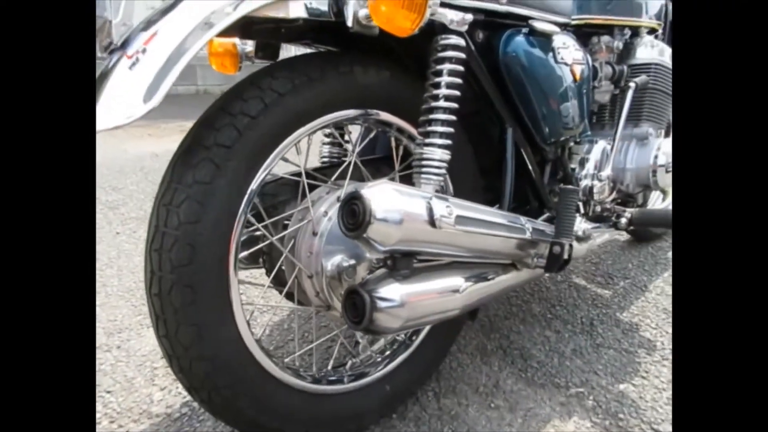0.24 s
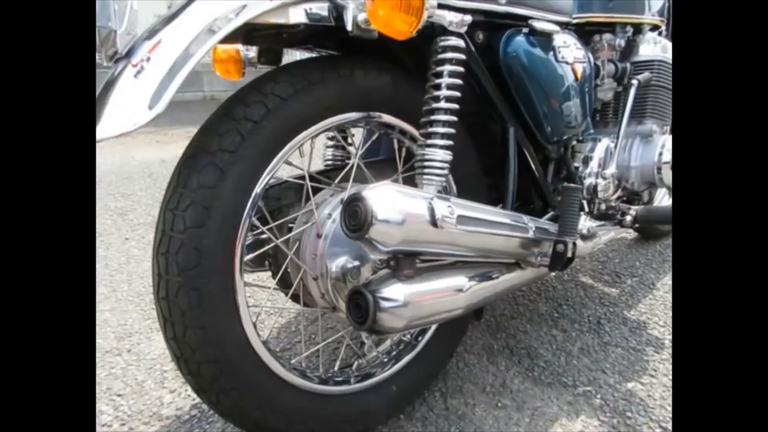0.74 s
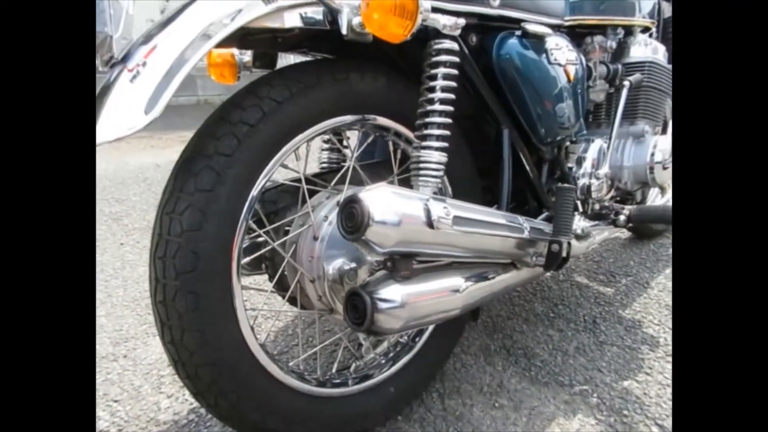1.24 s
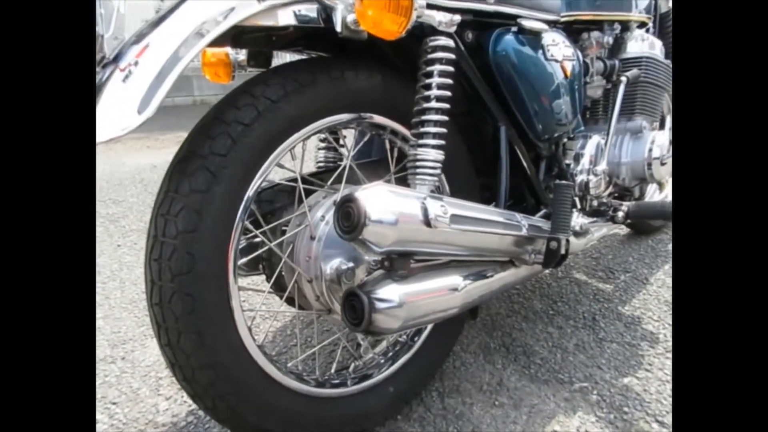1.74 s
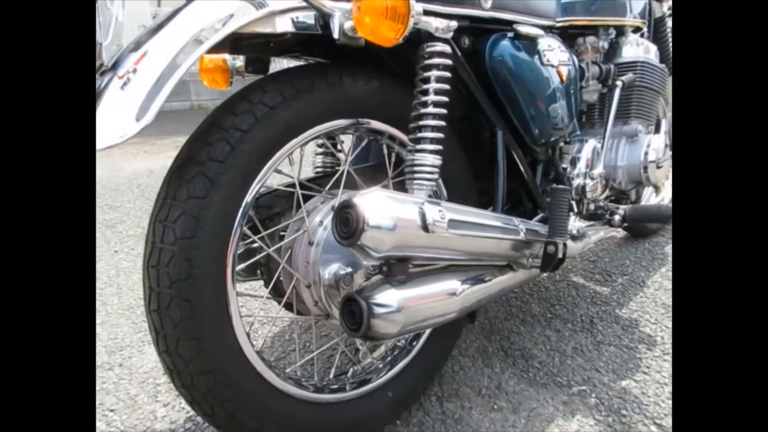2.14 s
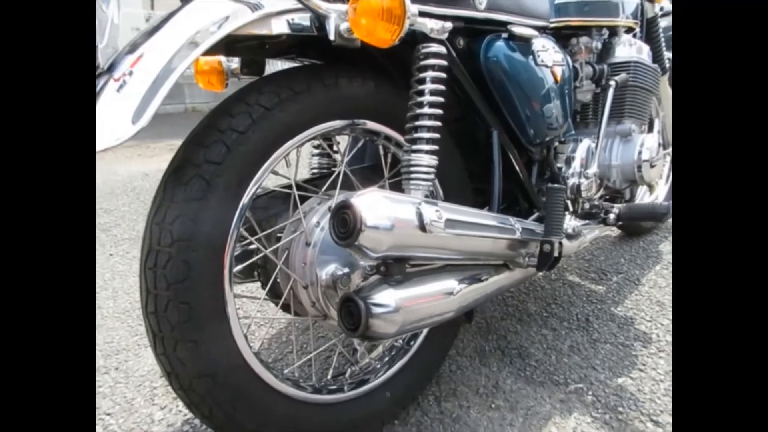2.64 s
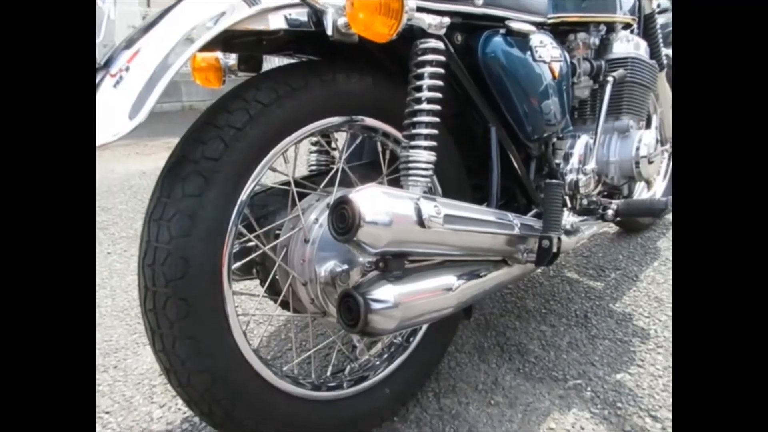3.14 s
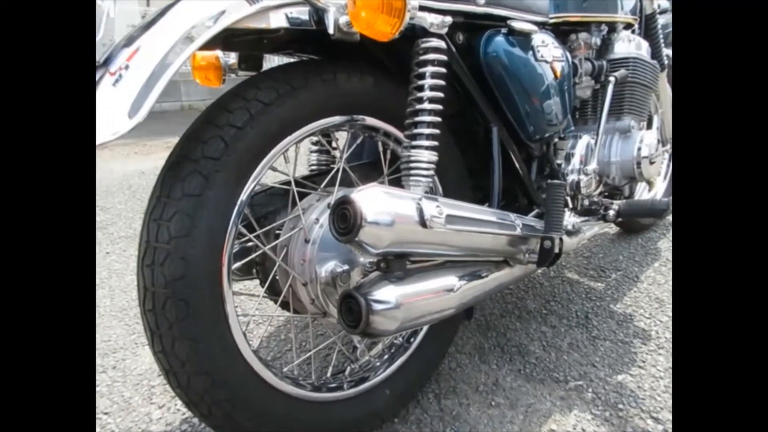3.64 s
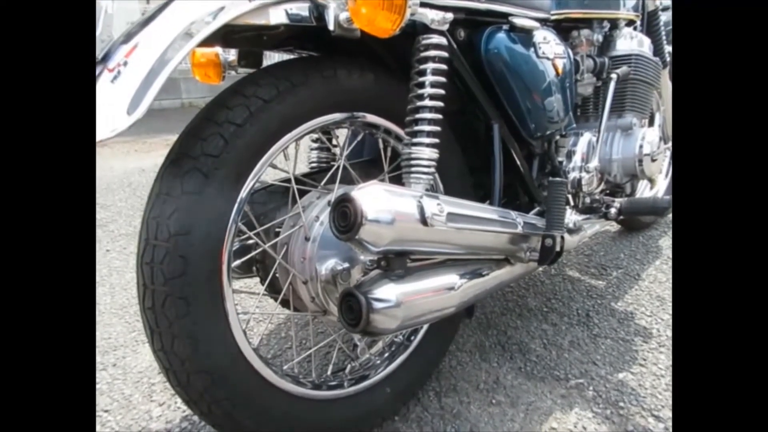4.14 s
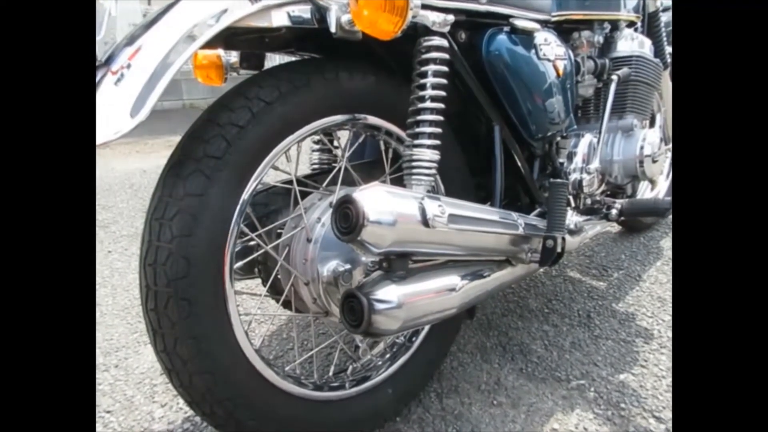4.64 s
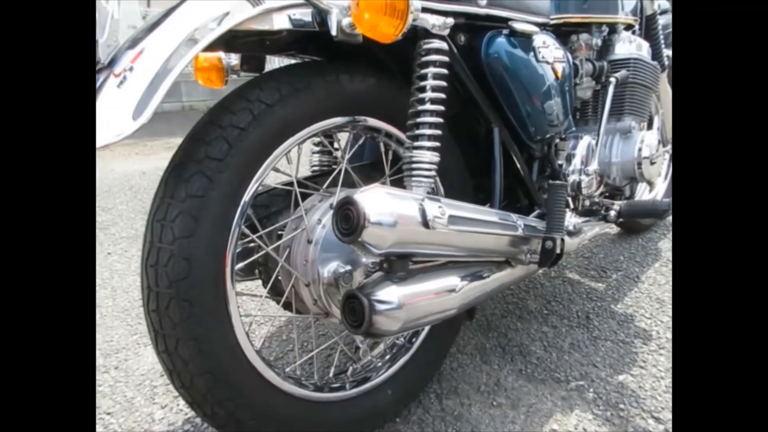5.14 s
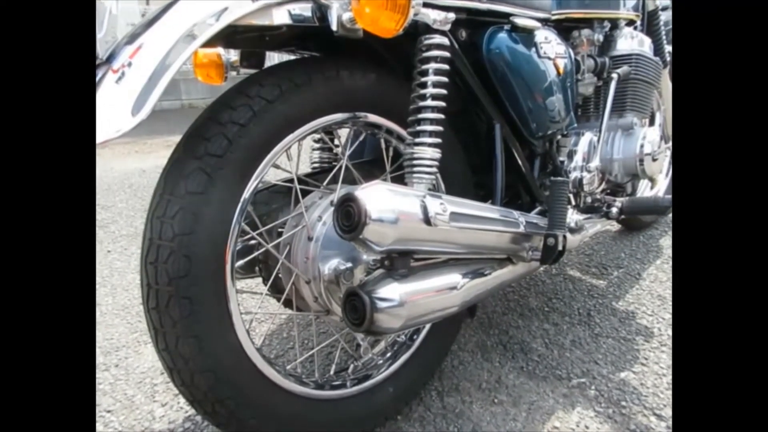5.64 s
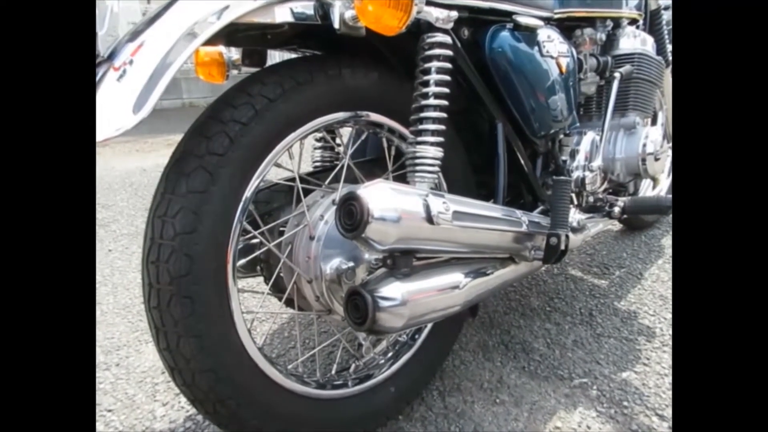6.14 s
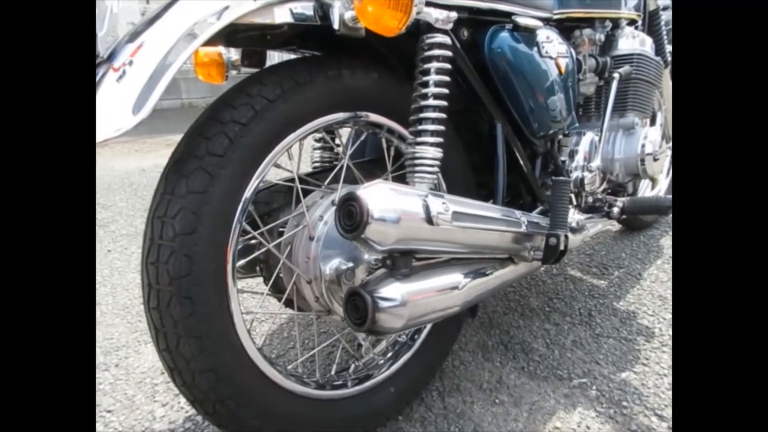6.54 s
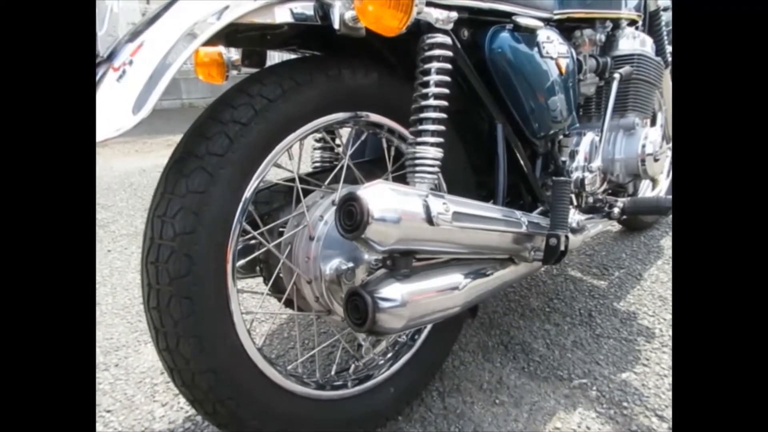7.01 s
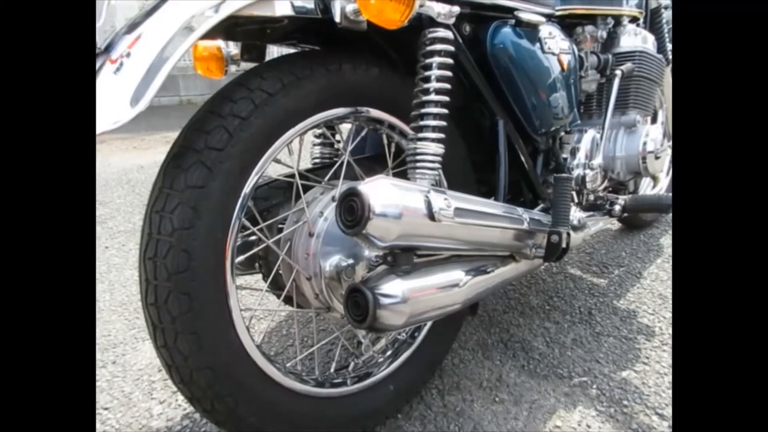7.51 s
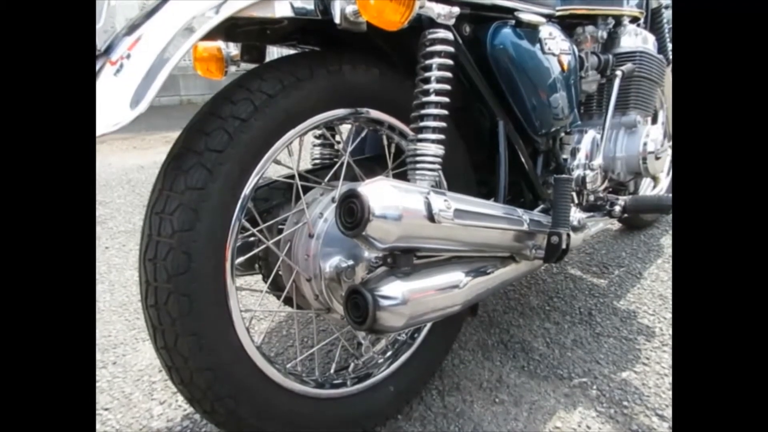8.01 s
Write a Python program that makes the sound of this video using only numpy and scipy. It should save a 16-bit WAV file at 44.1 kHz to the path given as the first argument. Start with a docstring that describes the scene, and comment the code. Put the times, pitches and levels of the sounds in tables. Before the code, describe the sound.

A four-cylinder motorcycle blips its throttle five times, each rev rising in a hollow boom and sinking to a lumpy, chirping idle.

```python
"""Four-cylinder motorcycle, throttle blips

Four pipes stand close to a stereo listener; five blips rise from a lumpy idle. Each firing booms in the
silencer; the nearest pipe chirps once a cycle by a jet whistling in its outlet. Gas roars in the pipes and
hisses at the outlets, the valve gear ticks, opening slides suck air. Unburnt gas pops twice near a shutting
throttle. The level starts low and climbs; after the second blip it drops suddenly and climbs back."""
import sys
import numpy as np
from scipy import signal
from scipy.io import wavfile
from scipy.ndimage import uniform_filter1d

SR = 44100
rng = np.random.default_rng(int(sys.argv[2]) if len(sys.argv) > 2 else 0)


def boost(x):
    """Linear amplitude factor 10**(x/20) for a level x in decibels (scalar or array-like)."""
    u = np.asarray(x, float) / 20
    return 10 ** u


def generate_wav(signal):
    """Clip the signal to [-1, 1] and save it as 16-bit WAV at the path in sys.argv[1]."""
    frames = np.transpose(np.atleast_2d(signal))
    scaled = np.clip(frames, -1, 1) * 32767
    pcm = np.round(scaled).astype(np.int16)
    wavfile.write(sys.argv[1], SR, pcm)


N = 364707
T = np.arange(N) / SR

# throttle blips, the first shut before t = 0: grip turns t/s, speed climbs t/s, grip shuts t/s,
# nominal crest speed/rpm, boom and roar offset/dB, hiss offset/dB
BLIPS = [(-1, -.92, -.55, 4400, 0, 0), (.68, .72, 1.05, 4050, 2.5, -1.5),
         (2.13, 2.215, 2.645, 4250, .5, -.7), (3.74, 3.77, 4.15, 4900, -1.2, -.7),
         (5.2, 5.30, 5.69, 4800, -1, 1), (6.72, 6.80, 7.185, 4750, 0, .5)]
# nearest-pipe firings: t/s, chirp level/dB, chirp f/Hz, upper-ring gain re chirp/dB
NEAR_FIRINGS = [(0.0214, -34, 2550, -20), (0.0942, -23, 2500, -18), (0.1785, -22, 2560, -15),
                (0.2823, -18, 2370, -19), (0.4095, -17, 2530, -17), (0.5531, -14, 2400, -18),
                (0.7118, -17, 2490, -15), (0.8131, -7, 2430, -17), (0.9941, -15, 2680, -21),
                (1.0824, -11, 2360, -16), (1.1478, -17, 2500, -22), (1.2141, -19, 2430, -26),
                (1.2501, -22, 2480, -16), (1.2895, -23, 2470, -14), (1.3329, -17, 2490, -21),
                (1.3774, -28, 2580, -15), (1.4316, -22, 2430, -23), (1.492, -25, 2650, -22),
                (1.5514, -24, 2470, -17), (1.6317, -32, 2560, -21), (1.715, -19, 2550, -17),
                (1.8238, -17, 2530, -17), (1.9455, -16, 2220, -25), (2.0877, -8, 2400, -22),
                (2.2338, -9, 2380, -15), (2.3296, -7, 2540, -13), (2.3905, -17, 2500, -18),
                (2.4359, -16, 2410, -16), (2.4788, -12, 2430, -21), (2.5162, -17, 2440, -14),
                (2.5531, -14, 2440, -17), (2.6484, -13, 2570, -10), (2.6784, -31, 2550, -13),
                (2.8589, -24, 2540, -22), (2.9826, -23, 2540, -25), (3.1393, -38, 2540, -18),
                (3.2081, -26, 2570, -19), (3.2884, -26, 2430, -17), (3.3832, -25, 2560, -16),
                (3.4984, -20, 2540, -20), (3.6331, -24, 2540, -18), (3.7673, -16, 2370, -19),
                (3.8636, -8, 2570, -16), (3.9235, -14, 2450, -7), (3.9674, -12, 2460, -12),
                (4.0687, -11, 2560, -11), (4.1694, -11, 2480, -15), (4.3655, -16, 2540, -22),
                (4.3989, -16, 2440, -22), (4.5126, -21, 2370, -20), (4.6513, -18, 2540, -19),
                (4.7117, -18, 2490, -25), (4.784, -35, 2580, -15), (4.8599, -14, 2390, -20),
                (4.9506, -16, 2500, -15), (5.0584, -12, 2590, -20), (5.1861, -16, 2430, -14),
                (5.3193, -11, 2440, -20), (5.4111, -14, 2380, -3), (5.467, -9, 2440, -13),
                (5.5064, -15, 2230, -8), (5.5418, -13, 2510, -10), (5.5757, -12, 2520, -13),
                (5.6042, -10, 2340, -10), (5.6311, -15, 2690, -5), (5.6565, -13, 2700, -9),
                (5.6844, -18, 2510, -17), (5.8117, -23, 2380, -20), (5.8706, -21, 2420, -20),
                (5.9015, -26, 2510, -14), (5.9359, -19, 2430, -19), (6.0102, -16, 2520, -30),
                (6.0521, -17, 2620, -27), (6.0985, -13, 2540, -21), (6.1399, -20, 2610, -20),
                (6.2028, -28, 2550, -18), (6.2577, -17, 2520, -26), (6.3295, -24, 2640, -20),
                (6.4123, -21, 2640, -18), (6.5131, -15, 2510, -20), (6.6318, -18, 2640, -17),
                (6.7645, -15, 2640, -18), (6.8793, -7, 2490, -20), (6.9446, -9, 2420, -11),
                (7.0319, -12, 2560, -8), (7.0943, -10, 2400, -14), (7.2804, -20, 2560, -21),
                (7.3083, -21, 2460, -20), (7.3687, -15, 2490, -20), (7.4026, -17, 2520, -18),
                (7.437, -18, 2370, -20), (7.4749, -12, 2370, -26), (7.5158, -16, 2530, -25),
                (7.5592, -15, 2590, -21), (7.6026, -21, 2580, -22), (7.654, -19, 2440, -23),
                (7.7214, -19, 2650, -28), (7.7812, -22, 2450, -19), (7.8585, -21, 2630, -22),
                (7.9488, -18, 2630, -14), (8.0596, -19, 2380, -22), (8.1828, -19, 2560, -12)]
# level by crank speed, throttle shut: speed/rpm, boom level/dB, roar level/dB, hiss level/dB, chirp level/dB
SHUT_LEVELS = [(800, -25.5, -43.5, -51.5, -22), (2000, -23.5, -40.5, -50, -24),
               (2550, -20.5, -37.5, -46.5, -22), (2950, -14.5, -35, -44.5, -24), (3700, -15, -33, -43, -28),
               (4800, -20.5, -31, -41, -37)]
# the same, throttle open: speed/rpm, boom level/dB, roar level/dB, hiss level/dB, chirp level/dB
OPEN_LEVELS = [(800, -17.5, -34, -40, -12), (1700, -16, -28.5, -35, -13), (2900, -16, -21, -36.5, -13),
               (3800, -18, -19, -36, -13), (4900, -22.5, -19.5, -34.5, -13)]
# sudden level drops: t/s, depth/dB, recovered t/s
LEVEL_DROPS = [(-.3, -4, .8), (2.66, -8.5, 3.95)]
# stereo width of the gas noise: f/Hz, side re mid/dB
NOISE_WIDTH = [(60, -34), (150, -32), (380, -26), (950, -22), (2380, -21), (5980, -4), (15000, -1)]
# treble loss of slow gas: f/Hz, gain/dB
SLOW_GAS_DULLING = [(2500, 0), (3500, -5), (5500, -8), (7000, -3), (9000, 0)]
# whistles at the throttle slides: f/Hz, level/dB, t60/s
SLIDE_WHISTLES = [(5400, -8, .015), (5950, -8, .015), (8600, -17, .01)]
# afterfire: t/s, relative level/dB, t60/s
AFTERFIRES = [(1.077, -26, .05), (2.638, -13.5, .05)]
# outlet jet noise spectrum: f/Hz, relative level per Hz/dB
HISS_SPECTRUM = [(760, -58), (1300, -12.5), (2010, -10), (2550, -4), (2860, -10), (3200, -10.5),
                 (4030, -19), (4850, -5), (5670, -17), (7000, -23), (9920, -26), (10800, -30),
                 (13000, -24.5), (15500, -38)]
# pipe turbulence spectrum: f/Hz, relative level per Hz/dB
ROAR_SPECTRUM = [(110, -27), (180, -12), (264, -12), (329, -13), (400, -8), (562, -8), (800, -11),
                 (1100, -14), (2000, -26), (2600, -64.5), (4400, -120)]
# pipe modes: f/Hz, level/dB, t60/s
PIPE_MODES = [(240, -5, .05), (330, -1, .065), (410, -5, .045), (490, -1.5, .06), (565, -4, .055),
              (740, -7, .045), (890, -8, .04), (1150, -14, .04)]
# nearest-pipe modes at idle: f/Hz, level/dB, t60/s
NEAR_MODES = [(345, 0, .05), (245, -4, .12), (440, -6, .03)]
# silencer modes: f/Hz, level/dB, t60/s
SILENCER_MODES = [(109.2, 3.5, .13), (67, -12.5, 0.086), (165.4, -7.5, 0.028)]
# hum partials: multiple of the cycle rate, level throttle shut/dB, level throttle open/dB
HUM_PARTIALS = [(2, -18, -3), (3, -19, -6), (4, 0, -2), (5, -14, -7), (6, -13, -7), (7, -19, -9),
                (8, -17, -8), (10, -24, -9), (12, -23, -4), (14, -32, -10)]
# what the silencers pass of the hum: f/Hz, gain/dB
SILENCER_PASS = [(40, -22), (70, -10), (95, -1), (120, 0), (170, -2), (260, -6), (600, -8)]
# side partials of the chirp: f/Hz, level/dB
CHIRP_SIDES = [(2190, -8), (2650, -8)]
# upper ring of the chirp: f/Hz, level/dB
CHIRP_OVERTONES = [(4900, 0), (5340, -4), (6100, -10), (7800, -17), (8600, -18), (10010, -15)]

# speed before the listed firings re-time the crank; past its crest it falls by a factor e in COAST_S
IDLE_RPM, COAST_S, CREST_LAG_S, CLIMB_POWER = 850, .53, .07, 1.5
GRIP_OPEN_S, GRIP_SHUT_S = .17, .07
LINGER_S = .45  # fade of a blip's level offsets after the grip shuts
DROP_POWER = 2.5  # above 1: recovers slowly at first
OVERRUN_DULLING = .6  # least share of the dulling with the throttle shut
INTAKE_DB, INTAKE_OPEN_S, INTAKE_LEAD_S = -47, .14, .06
INTAKE_LOW_HZ, INTAKE_HIGH_HZ = 3600, 9500
CHIRP_SWING_DB, CHIRP_SCATTER_DB = 2.5, 2.5  # unlisted chirps: alternate strong and weak
USUAL_CHIRP_HZ, USUAL_RING_DB = 2480, -16
SNAP_DB, SNAP_S = -13, .0022  # bright noise re upper ring; Gaussian sigma


def rms_one(x):
    """Scales to rms 1."""
    return x / np.sqrt(np.mean(x ** 2) + 1e-20)


def at_hz(points, hz):
    """Reads a spectrum on a log-frequency axis."""
    table = np.array(points)
    return np.interp(np.log(hz), np.log(table[:, 0]), table[:, 1])


def band(x, low_hz, high_hz, order=1):
    """Butterworth band-pass."""
    return signal.sosfilt(signal.butter(order, [low_hz, high_hz], "band", fs=SR, output="sos"), x)


def evened(x, window_s):
    """Divides out the slow level, keeps the single beats."""
    size = int(window_s * SR)
    power = uniform_filter1d(uniform_filter1d(x ** 2, size), size)
    return x / np.sqrt(power + 1e-12)


def flutter(per_s):
    """Random wandering through unit-spread knots, per_s of them a second."""
    knots_s = np.arange(0, N / SR + 1, 1 / per_s)
    return np.interp(T, knots_s, rng.standard_normal(len(knots_s)))


def fading(clicks, t60_s):
    """Every click decays exponentially."""
    return signal.lfilter([1], [1, -boost(-60 / (t60_s * SR))], clicks + 1e-18)


def ring(clicks, modes):
    """Clicks set decaying sines ringing."""
    out = 0
    for hz, level_db, t60_s in modes:
        r = boost(-60 / (t60_s * SR))
        w = 2 * np.pi * hz / SR
        feed = [0, boost(level_db) * np.sin(w)]
        out = out + signal.lfilter(feed, [1, -2 * r * np.cos(w), r * r], clicks + 1e-18)
    return out


def banded_noise(spectrum, dulling=0):
    """Third-octave bands of stereo noise, each with its level, flutter and width; rms 1."""
    low_end_hz, high_end_hz = spectrum[0][0], spectrum[-1][0]
    edges_hz = low_end_hz * 2 ** np.arange(0, np.log2(high_end_hz / low_end_hz), 1 / 3)
    white = rng.standard_normal((2, 2, N))
    out = 0
    for k, (low_hz, high_hz) in enumerate(zip(edges_hz, edges_hz[1:])):
        mid, side = band(white[k % 2], low_hz, high_hz, order=2)
        hz = np.sqrt(low_hz * high_hz)
        level_db = at_hz(spectrum, hz) + dulling * at_hz(SLOW_GAS_DULLING, hz) + 2.8 * flutter(per_s=25)
        out = out + boost(level_db) * (mid + boost(at_hz(NOISE_WIDTH, hz)) * side * [[1], [-1]])
    return rms_one(out)


def opening(start_s, rise_s, shut_s, fall_s):
    """Linear ramp 0 to 1 from start_s, back to 0 from shut_s."""
    return np.clip(np.minimum((T - start_s) / rise_s, 1 - (T - shut_s) / fall_s), 0, 1)


def twist_grip():
    """Throttle 0-1, its boom, roar, hiss and chirp offsets/dB, and rpm: S-shaped climb, then coasting."""
    throttle, offset_db, rpm = np.zeros(N), np.zeros((4, N)), np.full(N, 1. * IDLE_RPM)
    for turns_s, climbs_s, shuts_s, top_rpm, low_db, hiss_db in BLIPS:
        throttle = throttle + opening(turns_s, GRIP_OPEN_S, shuts_s, GRIP_SHUT_S)
        blip_db = np.array([[low_db], [low_db], [hiss_db], [0]])
        offset_db = offset_db + opening(turns_s, GRIP_OPEN_S, shuts_s, LINGER_S) * blip_db
        crest_s = shuts_s + CREST_LAG_S
        progress = np.clip((T - climbs_s) / (crest_s - climbs_s), 0, 1)
        climb = IDLE_RPM + (top_rpm - IDLE_RPM) * np.sin(np.pi / 2 * progress) ** CLIMB_POWER
        coast = top_rpm * np.exp(-np.maximum(T - crest_s, 0) / COAST_S)
        rpm = np.maximum(rpm, np.where(T < crest_s, climb, coast))
    return throttle, offset_db, rpm


def cycles_turned(rpm):
    """Engine cycles so far; uneven crank motion ends a whole cycle on each listed firing."""
    even = np.cumsum(rpm / 120 / SR)
    firing_s = np.array(NEAR_FIRINGS)[:, 0]
    passed = even[(firing_s * SR).astype(int)]
    steps = np.round(np.diff(passed, prepend=passed[0] - 1))
    whole = np.cumsum(np.maximum(steps, 1))
    return even + np.interp(T, firing_s, whole - passed)


def levels(rpm, throttle):
    """Boom, roar, hiss and chirp level/dB, blended between shut and open throttle."""
    shut_rpm, *shut = np.transpose(SHUT_LEVELS)
    open_rpm, *wide = np.transpose(OPEN_LEVELS)
    return np.array([(1 - throttle) * np.interp(rpm, shut_rpm, a) + throttle * np.interp(rpm, open_rpm, b)
                     for a, b in zip(shut, wide)])


def level_drop():
    """Level/dB falls within 30 ms and climbs back, slowly at first."""
    out_db = 0
    for start_s, depth_db, back_s in LEVEL_DROPS:
        recovered = np.clip((T - start_s) / (back_s - start_s), 0, 1) ** DROP_POWER
        out_db = out_db + depth_db * np.clip((T - start_s) / .03, 0, 1) * (1 - recovered)
    return out_db


def firing_samples(cycles):
    """Four firings a cycle; cylinder 0 feeds the nearest pipe."""
    count = np.floor(4 * cycles).astype(int)
    at = np.flatnonzero(np.diff(count)) + 1
    return at, count[at] % 4


def chirp_levels(near, usual_db):
    """Chirps scatter round their usual level; listed firings have their own."""
    k = np.arange(len(near))
    level_db = usual_db[near] + CHIRP_SWING_DB * (-1) ** k + CHIRP_SCATTER_DB * rng.standard_normal(len(near))
    for s, db, _, _ in NEAR_FIRINGS:
        level_db[np.argmin(np.abs(near - s * SR))] = db
    return np.interp(np.arange(N), near, level_db)


def blowdown(at, cylinder, idling, throttle, chirp_db):
    """One pulse a firing: even on the overrun, ragged under load, lumpy and one-sided at idle."""
    far_db = np.array([0, -2.5, -1.5, -3.5])[cylinder] + idling[at] * np.array([0, -6, -11, -13])[cylinder]
    # a strong firing also chirps loudly
    near_db = (cylinder == 0) * idling[at] * .2 * (chirp_db[at] + 15)
    scatter_db = 1.0 + (3.5 * idling[at] + 2.2 * throttle[at]) * np.where(cylinder == 0, .3, 1)
    size, early = rng.standard_normal((2, len(at)))
    path_s = np.array([0.0015, 0.0024, 0.00037, 0.0002])[cylinder]  # delay by outlet
    jitter_s = (.00015 + .00012 * throttle[at]) * early
    arrival = np.clip(at + ((path_s + jitter_s) * SR).astype(int), 0, N - 1)
    pulses = np.zeros(N)
    pulses[arrival] = boost(far_db + near_db + scatter_db * size)
    return pulses


def valve_gear(rpm, hiss_db, dulling):
    """Tappets and chain: random ticks, denser with speed, each ringing a few ms on the head."""
    happens = rng.random(N) < .15 * rpm / SR
    sizes = boost(7.6 * np.minimum(rng.exponential(1, N), 4)) * happens
    pitches_hz, dealt = np.geomspace(900, 8000, 14), rng.integers(0, 14, N)
    pans = boost(rng.normal(0, 0.67, 14))
    stereo = 0
    for k, (hz, pan) in enumerate(zip(pitches_hz, pans)):
        clicks = sizes * (dealt == k) * boost(dulling * at_hz(SLOW_GAS_DULLING, hz))
        tick = ring(clicks, [(hz, at_hz(HISS_SPECTRUM, hz), .018)])
        stereo = stereo + tick * [[pan], [1 / pan]]
    return boost(hiss_db - 2.5 - 1.5 * dulling) * evened(stereo, 0.18)


def intake():
    """Air sucked past the opening slides: bright hiss with fluttering whistles."""
    flow = sum(opening(turns_s - INTAKE_LEAD_S, INTAKE_OPEN_S, shuts_s, GRIP_SHUT_S)
               for turns_s, _, shuts_s, *_ in BLIPS)
    white = rng.standard_normal((2, N))
    rush = rms_one(band(white + white[1], INTAKE_LOW_HZ, INTAKE_HIGH_HZ)) * boost(2.5 * flutter(per_s=40))
    whistles = 0
    for hz, db, t60_s in SLIDE_WHISTLES:
        tone = rms_one(ring(white + white[0], [(hz, 0, t60_s)]))
        whistles = whistles + tone * boost(db + 6 * flutter(per_s=30))
    return boost(INTAKE_DB + level_drop()) * flow * (rush + whistles)


def pops():
    """Unburnt gas lights in the pipe: a spit of bright noise that also blows the outlet whistle."""
    burst = 0
    for s, level_db, t60_s in AFTERFIRES:
        held = (T > s) & (T < s + .018)
        shape = rms_one(fading(held * 1., t60_s)) * np.sqrt(0.0083 * SR / N)
        burst = burst + boost(level_db + 1) * shape
    white = rng.standard_normal((2, N))
    spit = rms_one(band(white + 0.5 * white[0], 700, 6500))
    whistle = rms_one(ring(white[0], [(USUAL_CHIRP_HZ, 0, .012)]))
    return burst * (spit + 0.4 * whistle)


def hiss(pulses, throttle, hiss_db, dulling):
    """Jet noise at the outlets, swelling with each firing, in sharp spits under load."""
    gust = 2.2 + evened(uniform_filter1d(fading(pulses, .08), 260), .2)
    spits = evened(uniform_filter1d(fading(pulses ** 2, .03), 90), .1)
    swell = evened(gust + 1.1 * throttle * spits, 0.3)
    return boost(hiss_db + 7) * banded_noise(HISS_SPECTRUM, dulling) * swell


def roar(pulses, throttle, roar_db):
    """Sharp fronts ring each pipe mode with a strength of its own; turbulent gas follows them."""
    fronts = 0
    for mode in PIPE_MODES:
        strength = rng.normal(1, .4, N) + .17 * rng.standard_normal(N) * [[1], [-1]]
        fronts = fronts + ring(pulses * strength, [mode])
    fronts = evened(fronts, .2)
    # gas needs 3 ms to get going
    gust = 1.2 - throttle + evened(uniform_filter1d(fading(pulses, .05), 130), .2)
    share = .08 + 1.5 * throttle  # fronts steepen under load
    turbulence = banded_noise(ROAR_SPECTRUM) * rms_one(gust)
    return boost(roar_db) * evened(share * fronts + turbulence, 0.064)


def near_pipe(at, cylinder, idling, chirp_db):
    """At idle the nearest pipe rings after each of its own firings."""
    near, pulses = at[cylinder == 0], np.zeros(N)
    pulses[near] = boost(chirp_db[near] - 14.5) * idling[near]
    return ring(pulses, NEAR_MODES)


def chirps(at, cylinder, chirp_db, rpm):
    """A jet whistles and snaps in the outlet for a few ms; at speed the silencer's next swing blows it again."""
    out, t = np.zeros(N + SR), np.arange(round(.03 * SR)) / SR
    draws = rng.standard_normal((len(at), 6))
    level_db = chirp_db[at] + np.array([0, -53, -26, -22])[cylinder]
    again_db = np.interp(rpm, [1200, 2500], [-17, -9])
    main_hz = USUAL_CHIRP_HZ * (1 + .03 * draws[:, 1])
    ring_db = USUAL_RING_DB + 3.5 * draws[:, 4]
    near = np.flatnonzero(cylinder == 0)
    for s, _, hz, upper_db in NEAR_FIRINGS:
        k = near[np.argmin(np.abs(at[near] - s * SR))]
        main_hz[k], ring_db[k] = hz, upper_db
    puff = rms_one(band(rng.standard_normal(N + SR), 3000, 12000))
    snap = np.exp(-.5 * ((t - .003) / SNAP_S) ** 2)
    for i, db, hz, upper_db, draw in zip(at, level_db, main_hz, ring_db, draws):
        phase, pitch, bend, again, _, side = draw
        rise = t / (.0027 * boost(1.5 * bend))
        late = np.maximum(t - .0105 - .001 * phase, 0) / .002
        second = boost(again_db[i] + 4 * again) * late ** 2 * np.exp(2 - 2 * late)
        shape = (rise * np.exp(1 - rise)) ** 3.5 + second
        # pitch wavers, as a rule sinking first as the jet slows
        bent = 2 * np.pi * (t + .00003 * (1 + bend) * np.sin(2 * np.pi * 110 * t))
        tone = np.cos(hz * bent + phase)
        for k, (f, side_db) in enumerate(CHIRP_SIDES):
            tone = tone + boost(side_db + 3.1 * side * (-1) ** k) * np.cos(f * bent + phase * (2 + k))
        upper = 0
        for k, (f, over_db) in enumerate(CHIRP_OVERTONES):
            upper = upper + boost(over_db) * np.cos(f * (1 + .012 * pitch) * bent + again * (2 + k))
        whistle = shape * tone / np.abs(shape * tone).max()
        bright = shape * upper + boost(SNAP_DB) * snap * puff[i:i + len(t)]
        out[i:i + len(t)] += boost(db) * (whistle + boost(upper_db) * bright)
    return out[:N]


def boom(pulses, rpm, throttle, evenness, boom_db):
    """Soft pushes ring the silencer; even firing merges into a wavering hum on cycle-rate multiples."""
    lead = round(.003 * SR)  # pressure rises just before the jet whistles
    push = band(np.roll(pulses, -lead), 52, 190, order=3)
    rung = evened(ring(push, SILENCER_MODES), .2)
    cycles = np.cumsum(rpm / 120 / SR)
    hum = 0
    for order, shut_db, open_db in HUM_PARTIALS:
        waver_db = ((1.8 if order == 4 else 4.0) + 2.5 * throttle) * flutter(per_s=18)
        level_db = shut_db + throttle * (open_db - shut_db) + at_hz(SILENCER_PASS, order * rpm / 120) + waver_db
        phase = order * (2 * np.pi * cycles + (.07 + .12 * throttle) * flutter(per_s=22))
        hum = hum + boost(level_db) * np.sin(phase)
    hum = evened(hum, .15)
    # under load the deepest push is lost
    deepest = signal.sosfilt(signal.butter(1, 60, fs=SR, output="sos"), rung)
    rung = rung - .8 * throttle * deepest
    low = np.sqrt(evenness) * hum + np.sqrt(1 - evenness) * rung
    lag = np.gradient(low) * 1.3  # the two microphones sit a little apart
    return boost(boom_db) * (low + lag * [[1], [-1]])


def scene():
    """All engine sounds, driven by crank speed and throttle."""
    throttle, offset_db, rpm = twist_grip()
    cycles = cycles_turned(rpm)
    rpm = uniform_filter1d(np.gradient(cycles) * 120 * SR, SR // 20)
    idling = np.clip((2200 - rpm) / 1000, 0, 1)
    dulling = np.maximum(idling, OVERRUN_DULLING) * (1 - throttle)
    evenness = .93 * (1 - idling) ** 2 * (1 - throttle * np.clip(1.5 - rpm / 4000, 0, 1))
    boom_db, roar_db, hiss_db, chirp_db = levels(rpm, throttle) + offset_db + level_drop()

    at, cylinder = firing_samples(cycles)
    chirp_db = chirp_levels(at[cylinder == 0], chirp_db)
    pulses = blowdown(at, cylinder, idling * (1 - .9 * throttle), throttle, chirp_db)

    mix = valve_gear(rpm, hiss_db, dulling) + intake() + pops()
    mix = mix + hiss(pulses, throttle, hiss_db, dulling) + roar(pulses, throttle, roar_db)
    mix = mix + near_pipe(at, cylinder, idling, chirp_db)
    chirp = np.roll(chirps(at, cylinder, chirp_db, rpm), -round(.0018 * SR))
    # off ground and frame, one delay a channel
    bounce = np.array([np.roll(chirp, round(delay_s * SR)) for delay_s in (0.0037, 0.0009)])
    mix = mix + chirp + boost(-19) * bounce
    return mix + boom(pulses, rpm, throttle, evenness, boom_db)


def low_pass(x):
    """Removes everything above the highest recorded frequency."""
    return signal.sosfilt(signal.butter(12, 16250, fs=SR, output="sos"), x)


def record(dry):
    """Rounds the peaks, cuts deep bass and top."""
    rounded = 1.229 * np.tanh(dry / 1.158)
    return low_pass(band(rounded, 22, 15000, order=2))


dry = scene()
out = record(dry)
generate_wav(out)
```